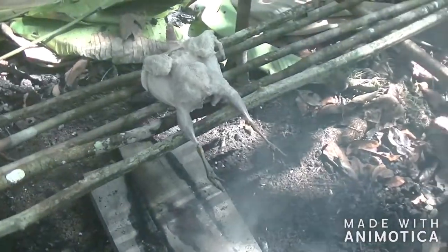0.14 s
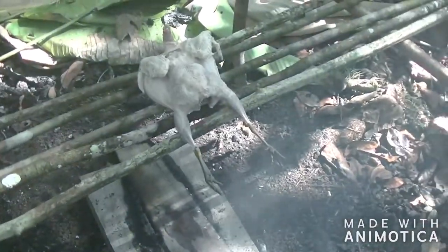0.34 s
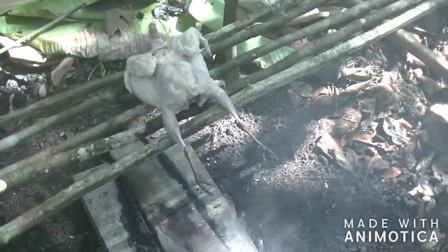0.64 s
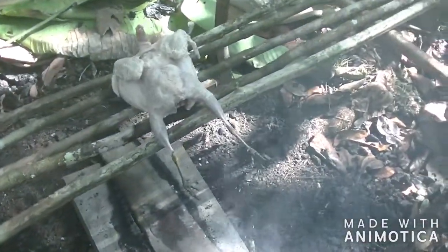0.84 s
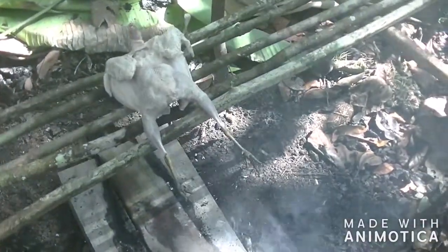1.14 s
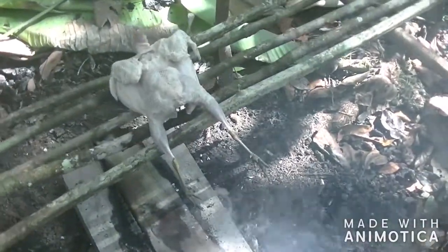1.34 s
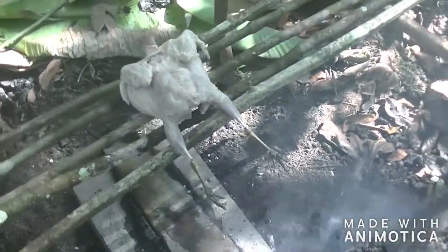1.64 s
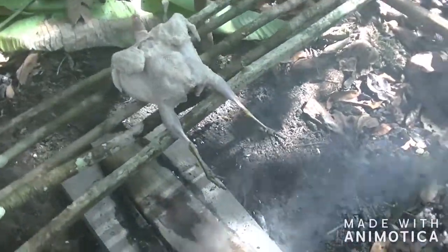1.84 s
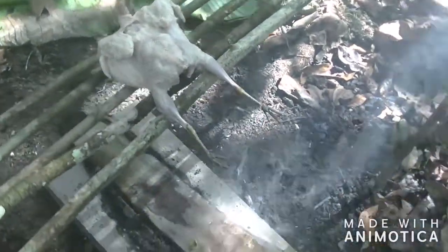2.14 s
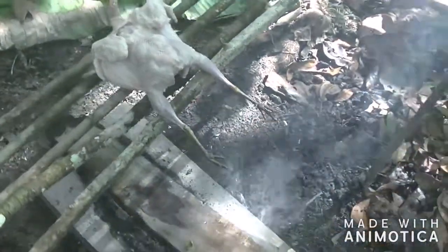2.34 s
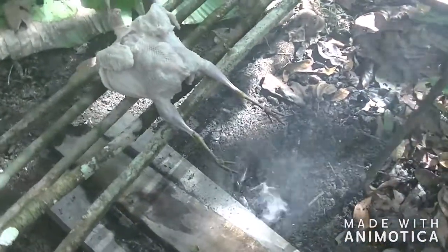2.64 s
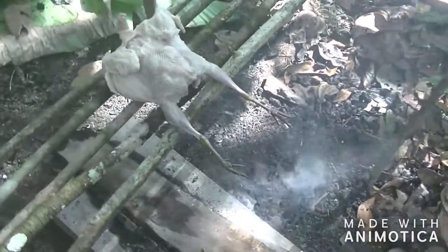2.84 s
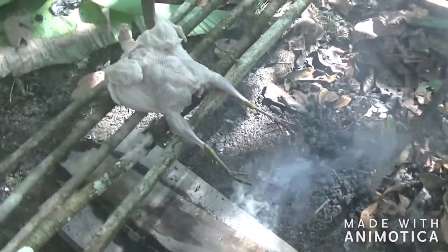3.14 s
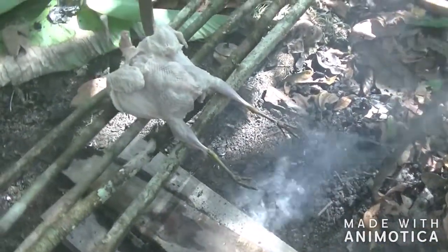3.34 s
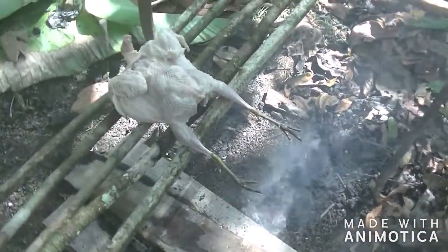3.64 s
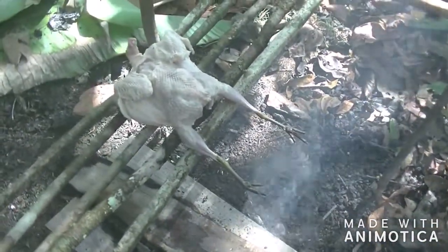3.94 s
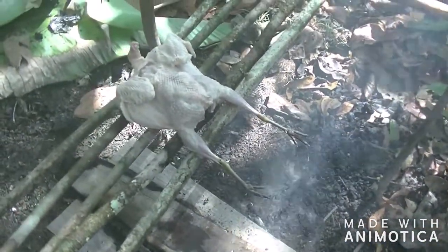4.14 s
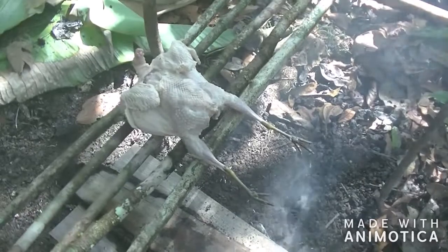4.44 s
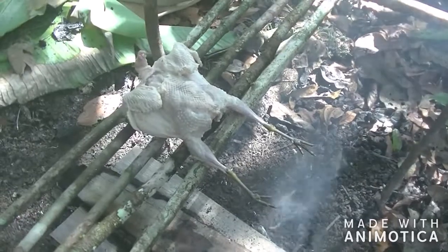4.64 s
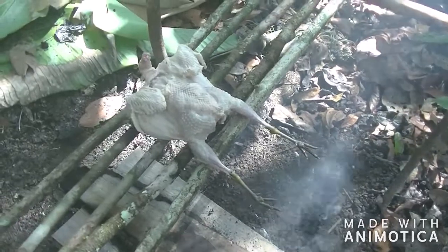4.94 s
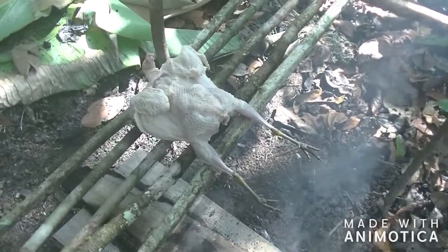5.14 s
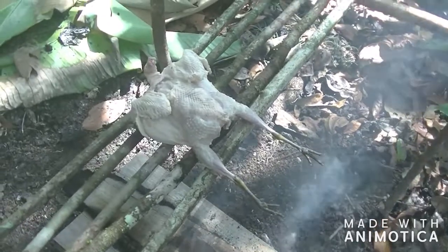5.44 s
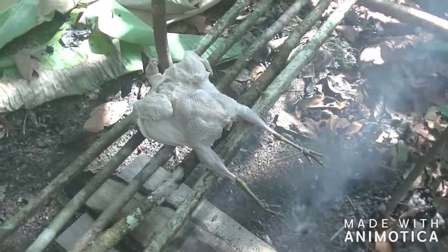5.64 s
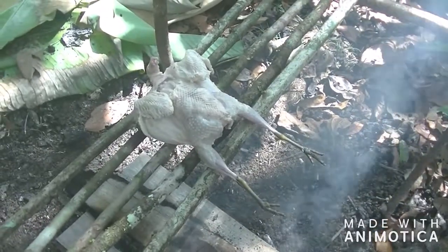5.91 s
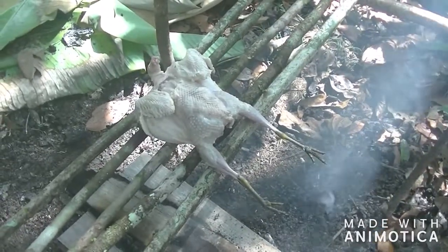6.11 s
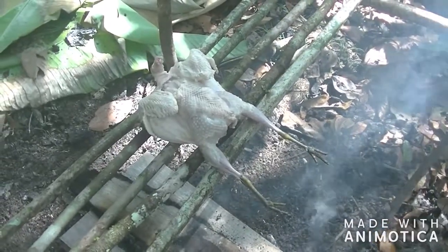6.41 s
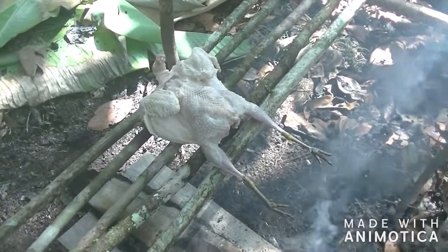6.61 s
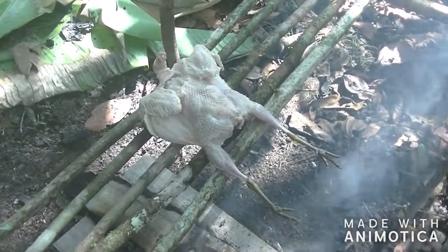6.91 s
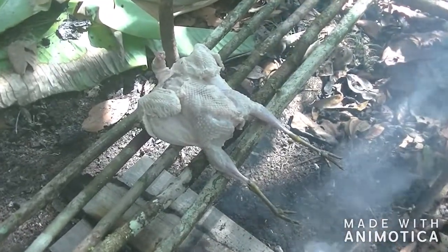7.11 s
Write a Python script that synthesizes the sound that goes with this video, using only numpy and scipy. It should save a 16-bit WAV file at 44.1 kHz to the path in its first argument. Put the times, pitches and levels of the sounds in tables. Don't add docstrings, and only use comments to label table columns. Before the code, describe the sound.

A smoky forest wood fire hisses softly under droning insects, then erupts in loud, sharp steam pops and splitting wood close to the microphone.

```python
import sys
import numpy as np
from scipy import signal
from scipy.fft import rfft, irfft, next_fast_len
from scipy.io import wavfile
from scipy.ndimage import uniform_filter1d

SR = 44100
rng = np.random.default_rng(int(sys.argv[2]) if len(sys.argv) > 2 else 0)


def bounce(signal):
    frames = np.transpose(np.atleast_2d(signal))
    limited = np.clip(frames, -1, 1)
    pcm = np.round(limited * 32767).astype(np.int16)
    wavfile.write(sys.argv[1], SR, pcm)


def decibels_to_gain(level_db):
    exponent = np.asarray(level_db, float) / 20
    return 10 ** exponent


N = 320607
EDGE_HZ = 15950


def evened(x):
    return x / np.sqrt(np.mean(x ** 2) + 1e-20)


def read(points, hz):
    f, value = np.transpose(points)
    return np.interp(np.log(hz + 1), np.log(f + 1), value)


def follow(rows, t):
    s, value = np.transpose(rows)
    return np.interp(t, s, value)


def add(mix, s, sound):
    part = mix[:, round(s * SR):][:, :sound.shape[1]]
    part += sound[:, :part.shape[1]]


def add_all(mix, rows, source):
    for s, *row in rows:
        add(mix, s, source(*row))


def resonate(x, hz, width, count=1):
    turn = np.exp(2j * np.pi * np.cumsum(hz * np.ones(x.shape[-1])) / SR)
    r = np.exp(-np.pi * width / SR)
    poles = np.poly([r] * count)
    shifted_down = x * turn.conj()
    return 2 * (turn * signal.lfilter([poles.sum()], poles, shifted_down)).real


def band(x, low_hz, high_hz):
    sos = signal.butter(N=4, Wn=[low_hz, high_hz], btype="band", fs=SR, output="sos")
    return signal.sosfilt(sos, x)


def coloured(x, points):
    size = next_fast_len(x.shape[-1])
    gain = decibels_to_gain(read(points, np.fft.rfftfreq(size, 1 / SR)))
    return irfft(rfft(x, size) * gain, size)[..., :x.shape[-1]]


def panned(db):
    return decibels_to_gain(np.array([[db / 2], [-db / 2]]))


def wide(same):
    a, b = rng.standard_normal((2, N))
    return np.array([a, same * a + np.sqrt(1 - same ** 2) * b])


def tone(hz, levels_db):
    turns = np.cumsum(hz) / SR
    sound = sum(np.sqrt(2) * decibels_to_gain(db) * np.sin(2 * np.pi * (k + 1) * turns) for k, db in enumerate(levels_db))
    return sound * signal.windows.tukey(len(hz), .1) * np.array([[1.1], [.8]])


def phrases(rows, rest_db, t, swell_s=0.12, stop_s=0.035):
    gain = 0
    for s, length, db in rows:
        shape = np.minimum((t - s) / swell_s, (s + length - t) / stop_s)
        gain = gain + decibels_to_gain(db) * np.clip(shape, 0, 1)
    return 10 * np.log10(gain ** 2 + decibels_to_gain(rest_db) ** 2)


def glide(rows, t):
    return sum(((t - s) / length - .5) * (t > s) * (t < s + length) for s, length, db in rows)


def singer(level_db, hz, width, throb_hz, sharp, steady, same):
    puffs = evened(np.exp(sharp * np.cos(2 * np.pi * throb_hz * np.arange(N) / SR)))
    drone = evened(resonate(wide(same), hz, width, count=2))
    loudness = uniform_filter1d(drone ** 2, size=40, axis=1) + 0.073
    return decibels_to_gain(level_db) * puffs * evened(drone / loudness ** (steady / 2))


def crickets(t):
    # time in seconds, level in dB.
    nearness = [(0.0, -71), (1.96, -73), (3.0, -65.5), (3.73, -63.5), (4.6, -64), (4.95, -58), (5.6, -54),
                (6.05, -56), (6.66, -53.5), (7.27, -53.5)]
    # pitch in Hz, width in Hz, throbs a second, sharpness, steadiness from 0 to 1.
    cricket_songs = [(3180, 28, 79, 0.068, 0.7), (3147, 125, 28, 0.19, 0.23)]
    waver = uniform_filter1d(uniform_filter1d(rng.standard_normal(N), size=700), size=700)
    near_db = follow(nearness, t) + 1.6 * evened(waver)
    first = singer(near_db - 3.5, *cricket_songs[0], same=0.73)
    return first + singer(near_db - 5.5, *cricket_songs[1], same=1.0)


def cicadas(t):
    # start in seconds, length in seconds, level in dB.
    cicada_phrases = [
        [(1.85, 0.55, -55.5), (3.78, 0.24, -59), (5.35, 0.34, -63), (5.98, 0.48, -57)],
        [(-.2, .8, -64), (1.07, 0.66, -58), (2.0, 0.17, -55), (3.4, 0.6, -57), (4.35, 0.41, -65),
         (5.62, 0.74, -53)],
        [(-.3, 0.43, -61), (.6, .2, -73), (1.4, 0.54, -58), (2.55, 0.69, -62), (3.45, 0.5, -58.5),
         (4.65, 0.44, -65), (5.27, 0.41, -57.5), (6.72, 0.49, -57)],
        [(1.07, 0.32, -70), (3.2, 0.47, -58), (5.62, .45, -67)],
    ]
    # pitch in Hz, width in Hz, throbs a second, sharpness, steadiness from 0 to 1.
    cicada_songs = [(5370, 270, 60.5, 1.8, 1), (5730, 360, 57, 0.49, 0), (6300, 390, 34, 0.36, 0.1),
                    (5580, 190, 71, 1.7, 1)]
    chorus_db = [-71, -67, -85, -90]
    glides_hz = [-260, 130, 60, 200]
    out = 0
    for rows, rest_db, glide_hz, (hz, *song) in zip(cicada_phrases, chorus_db, glides_hz, cicada_songs):
        level_db = phrases(rows, rest_db, t) - 5.5
        out = out + singer(level_db, hz + glide_hz * glide(rows, t), *song, same=0.91)
    return out


def katydids(t):
    # start in seconds, length in seconds, level in dB.
    high = [
        (-.2, 1.6, -71.5),
        (1.75, 0.78, -72),
        (3.4, 0.82, -71),
        (6.35, 0.89, -69.5),
    ]
    # pitch in Hz, width in Hz, throbs a second, sharpness, steadiness from 0 to 1.
    katydid_songs = [(7680, 170, 72, 0.37, 0.15), (7490, 340, 51, 0.56, 0.3), (7970, 270, 49, 0.28, 0.3)]
    rests_db = [-78, -78, -91]
    low = [(.28 + k * 1.68, 1.35, -68 - 1.6) for k in range(5)]
    out = 0
    for rows, rest_db, song in zip([low, low, high], rests_db, katydid_songs):
        level_db = phrases(rows, rest_db, t, swell_s=0.021, stop_s=0.18) - .5
        out = out + singer(level_db, *song, same=0.98)
    return out


def hoot(length, hz, db):
    u = np.arange(0, length, 1 / SR) / length
    return np.minimum(u / .15, 1) * tone(hz * (1 - .016 * u), [db - 18 * u ** 1.34])


def gnat(start_s, end_s):
    # middle in seconds, spread in seconds, level in dB.
    facing = [
        (3.1, 0.51, -68),
        (3.317, 0.2, -62),
        (3.15, 0.49, -74.5),
    ]
    t = np.arange(start_s, end_s, 1 / SR)
    levels_db = [db - np.minimum(8 * ((t - s) / spread) ** 2, 22) for s, spread, db in facing]
    return tone(567.5 - 8 * (t - t[0]), levels_db)


def flame():
    # frequency in Hz, level in dB per Hz.
    flame_colour = [(18, -52), (30, -22), (111, -9), (245, 1.5), (1120, -5.5), (1950, -7), (3120, -2),
                    (3560, -6), (4510, -11.5), (6020, -3), (6690, -13.5), (7830, -12.5), (8690, -15.5),
                    (14300, -22.5), (15900, -26.5)]
    # time in seconds, level in dB.
    draught = [(0.0, -62.5), (1.09, -61), (1.82, -62), (2.06, -61), (2.61, -62.5), (4.11, -61.5),
               (5.34, -63.5), (5.63, -62), (7.27, -63)]
    # frequency in Hz, likeness from -1 to 1.
    likeness = [(60, -0.6), (120, -0.74), (240, -0.55), (480, -0.57), (950, -0.28), (1890, 0.57),
                (3770, 0.71), (7520, 0.9), (15000, 0.95)]
    frames, hz = N // 256 + 5, np.fft.rfftfreq(1024, 1 / SR)
    a, b, c, d, patches = rng.standard_normal((frames, 513, 5)).T
    patches = uniform_filter1d(uniform_filter1d(patches, size=14, axis=0), size=10, axis=1)
    same = np.clip(read(likeness, hz), -1, 1)[:, None]
    left = a + 1j * b
    z = np.array([left, same * left + np.sqrt(1 - same ** 2) * (c + 1j * d)])
    level_db = follow(draught, np.arange(frames) * 256 / SR)
    moves = np.exp(-np.log((hz + 1) / 2400) ** 2 / 1.4)[:, None]
    swell_db = moves * (level_db - level_db.mean())
    z *= decibels_to_gain(read(flame_colour, hz)[:, None] + 1.24 * evened(patches) + swell_db)
    z *= hz[:, None] < EDGE_HZ
    return decibels_to_gain(-54.5) * evened(signal.istft(z, nperseg=1024, noverlap=768)[1][:, :N])


def crackle(per_s, spread_db, colour):
    size = decibels_to_gain(spread_db * np.minimum(rng.exponential(1, N), 4))
    grains = size * (rng.random(N) < per_s / SR)
    return evened(coloured(grains * wide(0.95), colour))


def settling_twigs(t):
    # start in seconds, length in seconds, level in dB.
    slips = [
        (0.082, 0.044, -51.5),
        (3.935, 0.03, -50),
        (4.111, 0.1, -51),
        (4.177, 0.042, -47.5),
    ]
    # frequency in Hz, level in dB.
    twig_colour = [(150, -7), (500, -9.5), (1600, 3), (2300, -1), (3600, 3.5), (4600, -6.5), (7500, -4.5),
                   (12000, -26)]
    gain = 0
    for s, length, db in slips:
        after = np.maximum(t - s, 0)
        fading_db = np.maximum(db - 5 * (after / length) ** 2, -200)
        gain = gain + np.minimum(after / 0.012, 1) * decibels_to_gain(fading_db)
    return gain * crackle(2500, 3, twig_colour)


def sap_sizzle(t):
    # middle in seconds, length in seconds, level in dB.
    spits = [
        (0.892, 0.024, -54),
        (.95, 0.078, -56.5),
        (1.102, .05, -60),
        (1.54, 0.14, -59.5),
        (1.63, .04, -69),
        (2.787, .02, -66),
        (3.094, 0.078, -64),
        (3.86, 0.034, -55),
        (4.04, 0.025, -55),
        (5.475, .008, -52),
    ]
    # frequency in Hz, level in dB.
    sap_colour = [(3000, -34), (6000, 14), (9000, 12), (10800, -2), (12200, 9), (15000, 8), (15900, -5),
                  (16100, -50)]
    gain = sum(decibels_to_gain(db) * np.exp(-(2 * (t - s) / length) ** 2) for s, length, db in spits)
    return gain * crackle(4000, 2.8, sap_colour)


def tick(peak_db, body_db):
    hz = 13500 + 510 * rng.uniform(-0.86, 1)
    click = np.zeros(400)
    click[:40] = rng.standard_normal(40)
    fizz = band(click, hz - 1600, min(hz + 1600, EDGE_HZ - 300))
    body = band(click, 7000, 9400)
    sound = fizz / abs(fizz).max() + decibels_to_gain(body_db + 1) * body / abs(body).max()
    return decibels_to_gain(peak_db - 6.5) * sound * np.ones((2, 1))


def thump(peak_db, hz):
    t = np.arange(round(.12 * SR)) / SR
    t60 = np.interp(peak_db, [-37.5, -34], [0.028, 0.0032])
    push = np.sin(2 * np.pi * hz * t)
    push += .5 * np.sin(2 * np.pi * hz * 1.73 * t) + 0.33 * np.sin(2 * np.pi * hz * 0.58 * t)
    push *= decibels_to_gain(-60 * t / t60) * np.minimum(t / 0.0015, 1)
    push = band(push, 93, 750)
    sideways = np.gradient(push) * SR / (2 * np.pi * hz)
    opposite = 0.29 * np.array([sideways, -sideways])
    return decibels_to_gain(peak_db) * (push + opposite) / abs(push).max()


def hollow(t, hz, t60):
    return evened(np.sin(2 * np.pi * hz * t) * decibels_to_gain(-60 * t / t60) * np.minimum(t / 0.00032, 1))


def knock(peak_db, hz, log_db, pan_db, dull_db=0, width=380, log_hz=940, log_t60=0.0096):
    t = np.arange(round(.09 * SR)) / SR
    blow = rng.standard_normal((2, len(t)))
    blow = (blow[0] + .5 * blow) * decibels_to_gain(-60 * t / 0.013) * np.minimum(t / 0.0002, 1)
    wood = evened(band(blow, 1300, 3700)) + 0.51 * evened(band(blow, 3680, 3760))
    sound = 0.6 * wood + 1.3 * evened(band(resonate(blow, hz, width), 600, 6500))
    bright_db = peak_db - 34 + dull_db + 12
    sound += decibels_to_gain(bright_db) * evened(band(blow, 5000, 12500))
    sound += decibels_to_gain(log_db + 10) * hollow(t, log_hz, log_t60)
    return decibels_to_gain(peak_db) * panned(pan_db) * sound / abs(sound.mean(0)).max()


def faint_knock(peak_db, hz):
    return knock(peak_db, hz, log_db=-36, pan_db=-2, dull_db=-22)


def log_knock(*row):
    return knock(*row, dull_db=-20, width=900, log_hz=872, log_t60=0.082)


def ring(modes, t, apart):
    out = np.zeros((2, len(t)))
    for (hz, db, t60), (tune, level, side) in zip(modes, rng.standard_normal((len(modes), 3))):
        detuned_hz, gain = hz * (1 + .008 * tune), decibels_to_gain(db + 1.5 * level)
        shift = apart * np.tanh(side) * np.array([[1], [-1]])
        out += gain * decibels_to_gain(-60 * t / t60) * np.sin(2 * np.pi * detuned_hz * t + shift)
    out *= 1 - np.exp(-(t / .0003) ** 2)
    return out / np.linalg.norm(out)


def split(modes, peak_db, snap_db, top_hz):
    t = np.arange(round(.07 * SR)) / SR
    grit = rng.standard_normal((3, len(t)))
    snap = band((t == 0) + 0.37 * grit[0] * decibels_to_gain(-60 * t / 0.0054), 2500, top_hz)
    fibres = band((grit[0] + .9 * grit[1:]) * decibels_to_gain(-60 * t / 0.033), 630, top_hz - 600)
    sound = ring(modes, np.maximum(t - .0008, 0), apart=0.43)
    sound += decibels_to_gain(snap_db) * snap / np.linalg.norm(snap) + decibels_to_gain(-9) * fibres / np.linalg.norm(fibres)
    spray = band(grit[1:] + grit[0], top_hz, 11700) * decibels_to_gain(-60 * t / 0.0056)
    sound += decibels_to_gain(4 * snap_db - 19) * spray
    return decibels_to_gain(peak_db) * sound / abs(sound.mean(0)).max()


def shaded(x):
    # centre in Hz, width in Hz, depth in dB.
    case_dips = [(6760, 490, -10), (10170, 1100, -12.5), (4620, 160, -9)]
    for dip_hz, width, db in case_dips:
        x = x - (1 - decibels_to_gain(db)) * resonate(x, dip_hz, width)
    return x


def pop(peak_db, wood_db, crack_db, upper_db):
    # pitch as a factor, level in dB, seconds to fade by 60 dB.
    cell_modes = [(.66, -17, 0.0045), (.8, -17, 0.0068), (.92, -5.5, 0.009), (1.0, 18, 0.0056),
                  (1.06, -6.5, 0.025), (1.13, -4, .007)]
    # pitch in Hz, level in dB, seconds to fade by 60 dB.
    wood_modes = [(250, 6, 0.036), (1120, 3, 0.0077), (1560, 28.5, 0.016), (1900, -36, 0.0051),
                  (2250, -42, .012)]
    crack_modes = [(7550, 7, 0.0044), (8150, 2.5, 0.0061), (8880, -2.5, 0.0068), (9870, 1.5, 0.0051),
                   (12000, -17, 0.0037), (13600, -10, 0.0031), (15000, -18, 0.0031)]
    upper_modes = [(4800, -4, 0.0082), (5050, -2, .007), (5300, 1, .008), (5620, 1, 0.0042)]
    t = np.arange(round(.07 * SR)) / SR
    hz = 3637 + 11 * peak_db
    burst = ring(np.multiply(cell_modes, [hz, 1, 1]), t, apart=.13)
    fibres = band(rng.standard_normal(len(t)) * decibels_to_gain(-60 * t / 0.014), 2790, 5420)
    burst += decibels_to_gain(upper_db) * ring(upper_modes, t, apart=0.69)
    burst += decibels_to_gain(-11.5) * fibres / np.linalg.norm(fibres)
    burst += decibels_to_gain(wood_db + 12.0) * ring(wood_modes, t, apart=0.81)
    late = np.maximum(t - 0.000427, 0)
    burst += decibels_to_gain(crack_db + 6.0) * ring(crack_modes, late, apart=0.43)
    burst += decibels_to_gain(2 * wood_db - 24) * hollow(t, 876, 0.045)
    echo = rng.standard_normal((2, 600)) * decibels_to_gain(-60 * t[:600] / 0.016) * (t[:600] > .0012)
    echo = (echo + 0.16 * echo[::-1]) / np.linalg.norm(echo)
    burst += decibels_to_gain(-13.5) * signal.fftconvolve(burst, echo, axes=1)[:, :len(t)]
    burst = shaded(burst)
    return decibels_to_gain(peak_db) * burst / abs(burst.mean(0)).max()


def scene():
    # start in seconds, length in seconds, pitch in Hz, level in dB.
    hoot_rows = [
        (4.31, .4, 653, -56.5),
        (7.01, .08, 1062, -61.5),
    ]
    # time in seconds, peak in dB, body relative to the fizz in dB.
    tick_rows = [(0.1755, -45, -9), (0.1999, -45, -10), (0.3207, -43, -9), (0.407, -45, -9),
                 (0.5501, -44, -5), (0.8956, -36, 7), (0.9614, -40, -8), (0.991, -34, -16),
                 (1.0904, -50, -4), (1.1024, -43, -9), (1.3753, -43, -7), (1.4361, -47, 8),
                 (1.5025, -50, 2), (1.536, -41.5, 7), (1.5514, -38, -6), (1.6147, -49, -9),
                 (1.7554, -44, -8), (1.7848, -45, -10), (2.1006, -41, -2), (2.307, -44.5, 6),
                 (2.6219, -54, -8), (2.7854, -36, -19), (3.0767, -44, -1), (3.8556, -48, -4),
                 (4.0442, -50, 9), (4.4942, -41, -9), (5.4734, -37, -2), (0.1234, -59, 12)]
    # time in seconds, peak in dB, pitch in Hz.
    thump_rows = [(2.599, -59, 113), (3.811, -42.5, 295), (3.8372, -33.5, 302), (3.833, -46, 250),
                  (3.848, -51, 161), (3.907, -49.5, 277), (3.932, -45, 173), (3.946, -42, 238),
                  (3.973, -52, 218), (4.164, -36.5, 202), (4.193, -41.5, 250), (4.306, -34, 250),
                  (4.455, -35, 192), (4.469, -32, 232), (4.48, -44, 206), (4.494, -50, 320),
                  (4.567, -59, 248), (4.701, -49, 225), (4.814, -53, 213), (4.832, -49, 148),
                  (4.926, -52, 228), (5.318, -51, 179), (5.762, -55, 280), (5.793, -50, 185),
                  (5.848, -43.5, 239), (6.061, -50.5, 254), (6.103, -56, 215), (6.219, -54.5, 238),
                  (6.395, -52, 293)]
    # time in seconds, peak in dB, centre in Hz.
    faint_rows = [
        (0.393, -47, 1120),
        (.896, -41, 3000),
        (2.839, -45, 4900),
        (2.991, -42, 3000),
        (6.092, -44, 2646),
        (6.387, -41, 3860),
        (6.396, -36, 1350),
        (5.408, -43, 2520),
        (5.473, -39.5, 5200),
    ]
    # time in seconds, peak in dB, centre in Hz, hollow log ring in dB, left-right in dB.
    knock_rows = [(0.082, -45, 1600, -23, -5), (0.088, -41.5, 1900, -16, -3), (0.097, -43, 3500, -30, 0),
                  (0.106, -44, 2000, -30, -3), (2.032, -45, 3180, -8, 0.0), (2.088, -34, 3000, -39, -3),
                  (2.306, -46, 3250, -29, -6), (2.444, -45, 2390, -24, -6), (3.8440, -35.5, 4120, -41, -2),
                  (3.8441, -30, 2100, -41, 2), (3.8562, -41, 4030, -40, 0), (3.907, -49, 3500, -27, 0),
                  (3.947, -41, 3240, -14, 0), (3.9642, -30, 3630, -36, -2), (4.0445, -35.5, 3800, -35, -4),
                  (4.045, -39, 1770, -38, 0.0), (4.494, -46, 800, -27, -18)]
    log_rows = [
        (5.32, -33.5, 1560, -20, 0.5),
    ]
    # time in seconds, peak in dB, bright snap in dB, top of the snap in Hz.
    split_rows = [
        (3.8151, -17, -3.5, 5200),
        (3.8376, -18, -6, 5500),
        (5.8493, -19.5, -6, 4300),
    ]
    # pitch in Hz, level in dB, seconds to fade by 60 dB.
    first_branch = [(1920, -6, 0.019), (2360, 1, 0.012), (2880, -2.5, 0.015), (3830, -4, 0.014),
                    (4520, -15, 0.023), (4904, -27, 0.01), (5265, -35, 0.026)]
    second_branch = [(940, -6.5, 0.017), (1570, -17, .013), (1880, 1, 0.0067), (2390, 2.5, 0.014),
                     (3020, -8, 0.0063), (3640, -4, 0.011), (4500, -11, .009), (5200, -16, .006)]
    late_branch = [(897, -8.5, 0.064), (1550, 3.5, 0.017), (1900, -1, 0.026), (2290, 2, 0.014),
                   (2700, -4, 0.027), (3580, -11, 0.015), (4468, -23, 0.013)]
    # time in seconds, peak in dB, low wood ring in dB, high crack in dB, upper ring in dB.
    pop_rows = [(4.164, -0.5, -44, -15, -15), (4.169, -2.5, -34, -16.5, -9), (4.3075, -4, -28.5, -13, -6),
                (4.4496, -5.5, -26, -11, -4), (4.4683, -6.5, -30.5, -13.5, -12),
                (4.7025, -5, -30.5, -13.5, -8), (4.8157, -5, -29, -13, -3.5), (4.8335, -9.5, -45, -19, -16),
                (5.7638, -3, -48, -18.5, -8.5), (5.7925, -7, -23.5, -18, -8),
                (6.0618, -14, -19.5, -22.5, -10), (5.7662, -10, -29, -29, -15)]

    t = np.arange(N) / SR
    mix = crickets(t) + cicadas(t) + katydids(t)
    add_all(mix, hoot_rows, hoot)
    add(mix, 2.64, gnat(2.64, 3.8))
    mix += flame() + settling_twigs(t) + sap_sizzle(t)
    add_all(mix, tick_rows, tick)
    add_all(mix, thump_rows, thump)
    add_all(mix, faint_rows, faint_knock)
    add_all(mix, knock_rows, knock)
    add_all(mix, log_rows, log_knock)
    for modes, (s, *row) in zip((first_branch, second_branch, late_branch), split_rows):
        add(mix, s, split(modes, *row))
    add_all(mix, pop_rows, pop)
    return mix


def roll_off(x):
    return signal.sosfilt(signal.butter(12, 17050, fs=SR, output="sos"), x)


def record(dry):
    soft = dry / (1 + abs(dry / 1.02) ** 8) ** (1 / 8)
    limited = coloured(soft, [(16400, 0), (17000, -50)])
    return roll_off(limited)


dry = scene()
out = record(dry)
bounce(out)
```